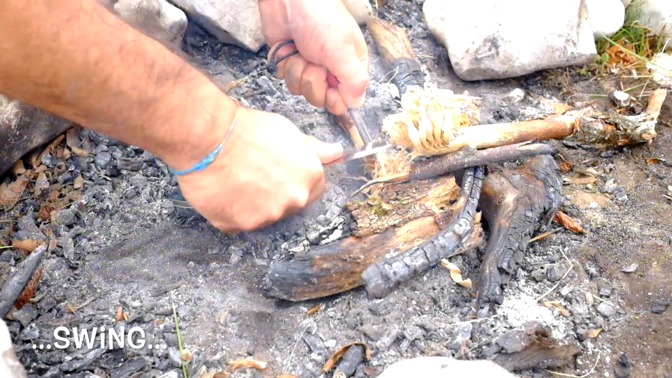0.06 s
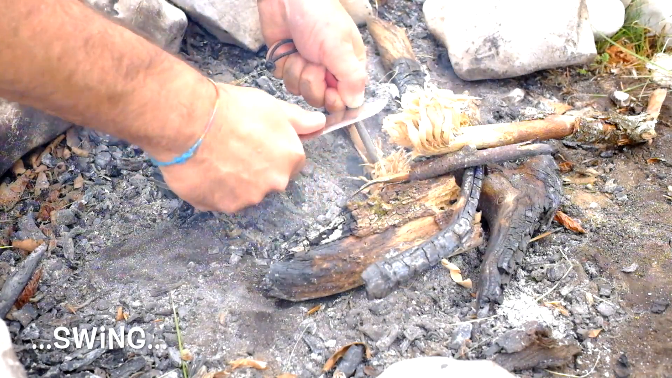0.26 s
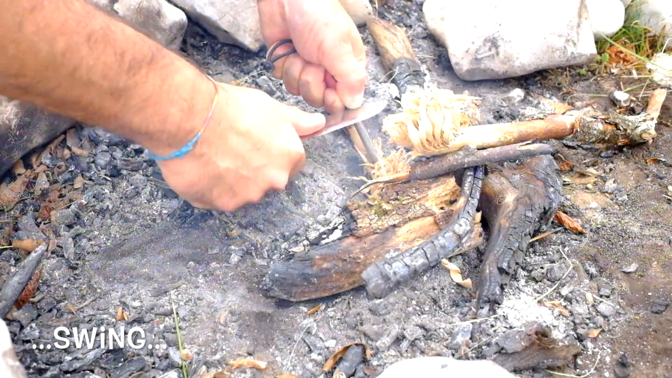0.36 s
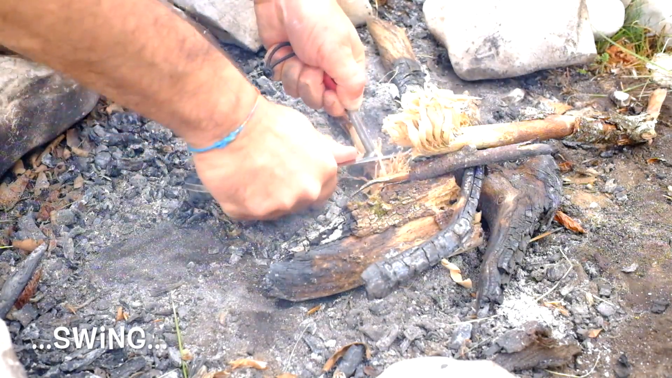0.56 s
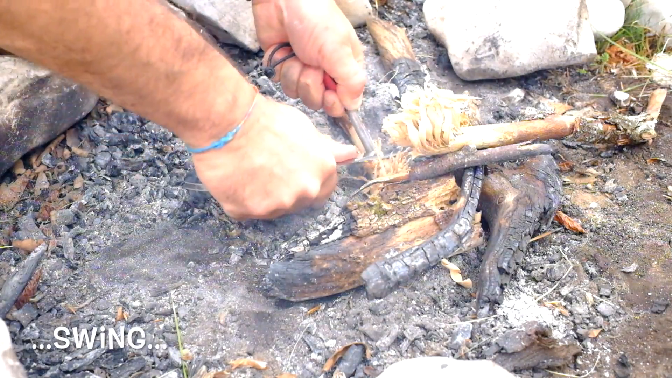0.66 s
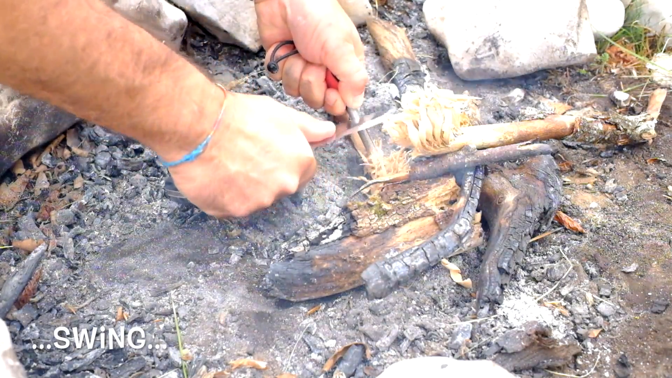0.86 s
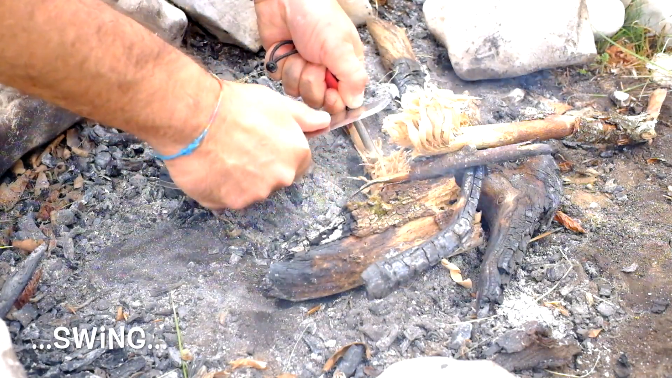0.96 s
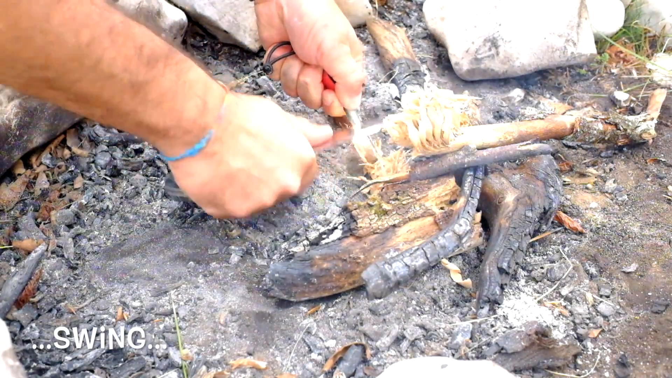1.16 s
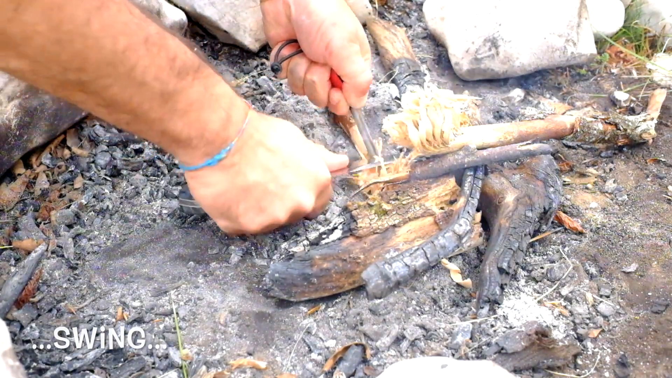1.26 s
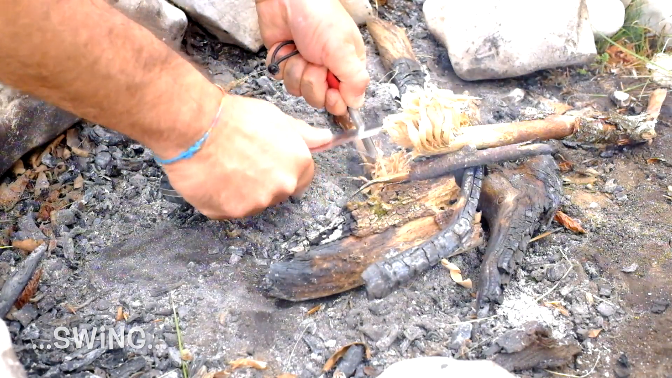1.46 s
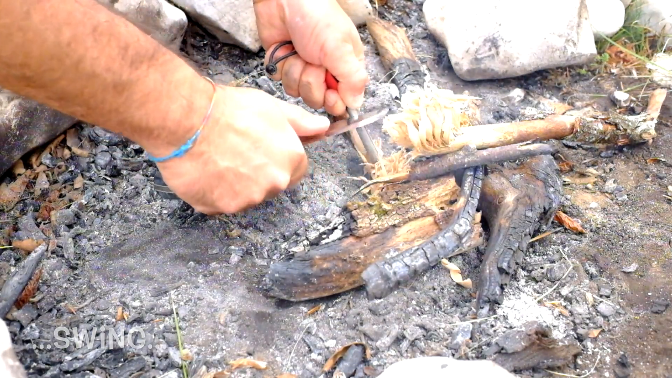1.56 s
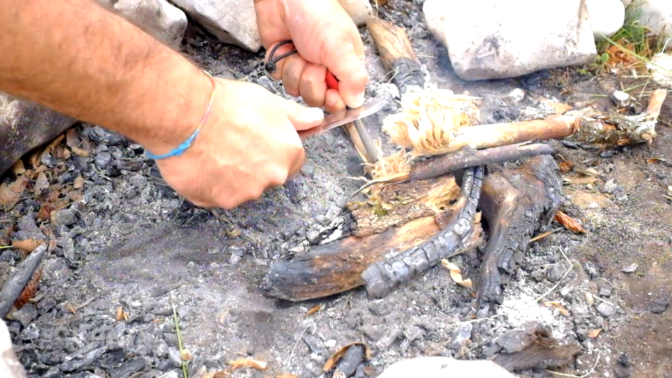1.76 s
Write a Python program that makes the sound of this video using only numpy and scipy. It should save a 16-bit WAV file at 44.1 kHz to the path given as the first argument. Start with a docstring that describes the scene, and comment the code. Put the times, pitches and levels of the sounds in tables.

```python
"""Outdoors, microphone close by: quiet air, a faint falling whistle (perhaps a bird), and a knife on a
ferro rod pressed on wood shavings. First the blade knocks on the rod and slides lightly along it, amid dry
ticks and crackles. Then comes a strike: a rasp of tiny slips over a low shudder, with a hiss of sparks and a
deep thud into the ground. A light slide back, a second strike and a last slide follow. The rod bobs when the
blade lets go. Friction is noisy slip trains through tool resonances; whistle and gliding resonances are
narrow noise bands; knock, bobs and thuds are short sines."""
import sys
import numpy as np
from scipy import signal
from scipy.fft import rfft, irfft, next_fast_len
from scipy.io import wavfile

SR = 44100
rng = np.random.default_rng(int(sys.argv[2]) if len(sys.argv) > 2 else 0)


def store_pcm(level_fs):
    """Save levels as 16-bit WAV."""
    pcm = np.round(np.clip(level_fs, -1, 1) * 32767).astype(np.int16)
    wavfile.write(sys.argv[1], SR, np.atleast_2d(pcm).T)


N = 81585  # length in samples

# Outdoor air spectrum: pitch_hz, relative_level_db
AIR_COLOUR = [(20, -8.5), (45, -3), (110, 0.5), (170, -5.5), (280, -12.5), (600, -15), (1150, -17),
              (1700, -23), (4000, -26), (15000, -28.5)]
# Stereo spread of the air: pitch_hz, side_against_middle_db
AIR_SIDE = [(30, -29), (150, -36), (1000, -20.5), (4000, -16.5), (12000, -7)]
AIR_DB = -59
# Brief narrow noise bands, most of them gliding: a faint falling whistle first (perhaps a bird),
# then resonances of the rubbing contact:
# start_s, end_s, from_hz, to_hz, width_hz, level_db (rms at the height of the swell)
GLIDES = [(0.014, 0.057, 5200, 3300, 700, -67.5), (.036, .05, 1700, 1750, 250, -57),
          (0.138, 0.202, 4700, 4090, 900, -56.5), (0.197, 0.244, 165, 120, 39.8, -47),
          (0.252, 0.323, 1950, 2540, 587, -57), (.305, 0.319, 3000, 3290, 597, -53.5),
          (0.463, 0.513, 283.3, 300, 59.5, -41), (0.512, .55, 370, 279, 79, -33),
          (0.554, 0.591, 190.2, 134, 30.3, -33), (.76, 0.846, 175.8, 145, 39.3, -46.5),
          (1.415, 1.511, 176, 142, 40, -45.5), (1.527, 1.596, 520, 474, 120, -47),
          (1.686, 1.717, 2176, 2980, 800, -65.5)]
# Dry ticks and crackles, levels before the layer trims:
# start_s, level_db, treble_against_body_db, chatter_decay_s, ring_hz
TICKS = [(.042, -53.5, -5, 0.0076, 1690), (.159, -34, -14, .004, 1200), (.185, -39, -18, 0.0056, 1210),
         (0.557, -28.5, -25, 0.0024, 755), (.567, -26.5, -16, 0.0027, 647),
         (0.6264, -37.5, -19, 0.0034, 1110), (0.629, -33.5, -15, 0.0088, 1100),
         (0.641, -49.5, 2, 0.0038, 1130), (.666, -52.5, -4, 0.0054, 1190), (0.7499, -37, -10, 0.01, 1100),
         (0.777, -39.5, -29, 0.0049, 1270), (.796, -34.5, -10, 0.0015, 1190), (.9285, -35, -3, 0.0029, 620),
         (0.941, -38, -10, 0.0016, 1130), (.970, -41, -2.5, 0.0055, 1140), (.986, -47.5, -4, 0.011, 1210),
         (1.007, -47, -1, 0.0035, 1150), (1.010, -34.5, -8, 0.0033, 1200), (1.0194, -42.5, -4, 0.0022, 720),
         (1.0505, -36.5, -6.5, 0.0048, 1100), (1.059, -39, -8, 0.0022, 590),
         (1.0639, -31.5, -2, 0.001, 1130), (1.066, -34, -5.5, .002, 1250),
         (1.1329, -38.5, -8.5, 0.0037, 1860), (1.137, -40, -5.5, 0.0064, 1810),
         (1.149, -37.5, -17, 0.0044, 1150), (1.156, -43.5, -11, 0.0075, 1100),
         (1.173, -46.5, -5, 0.013, 1210), (1.2747, -28, -11, 0.0046, 700),
         (1.2925, -25.5, -11, 0.0038, 1170), (1.3015, -22.5, -16, 0.0025, 1160),
         (1.323, -37, -12, 0.0039, 755), (1.3975, -43.5, -10.5, 0.0029, 1080),
         (1.7692, -46, -10, 0.002, 1130)]
TICK_RING_DB, TICK_RING_WIDTH_HZ, TICK_RISE_S = -5, 136, 0.0002
# Tick spectra, dull body and bright snap: pitch_hz, relative_level_db
TICK_BODY = [(80, -29), (200, -6.5), (600, 0.5), (1100, 1.5), (1550, -10), (2200, -14.5), (4000, -25),
             (15000, -63)]
TICK_SNAP = [(700, -18.5), (2000, 10.5), (4000, 3.5), (6000, -2.5), (9000, 0), (13000, -8), (16000, -9)]
# Light slides of the blade, one list of breakpoints each, levels before the layer trims:
# time_s, shudder_db, rasp_db, treble_db
SLIDES = [
    [(.07, -61, -61.5, -72), (.095, -40, -49.5, -58), (.135, -48.5, -44.5, -52.5), (.16, -54, -41, -49),
     (.2, -52, -49.5, -57), (.24, -52.5, -59.5, -56.5), (.262, -61, -57, -59), (.318, -47.5, -48, -52.5),
     (.326, -48.5, -66, -87)],
    [(.68, -77, -68, -65), (.71, -81, -50.5, -61), (.745, -73, -56.5, -72), (.78, -54, -45.5, -55),
     (.83, -45, -52, -62), (.87, -48, -44, -56.5), (.935, -42.5, -42.5, -53), (1.005, -45, -46, -61),
     (1.03, -64, -62, -81), (1.047, -67, -50, -60), (1.075, -58, -55, -59)],
    [(1.42, -48, -56, -83), (1.432, -43.5, -62, -68), (1.455, -47.5, -49, -59.5), (1.52, -48.5, -48, -54.5),
     (1.56, -46, -44.5, -52.5), (1.605, -48, -54, -64), (1.645, -62, -72, -85), (1.665, -51.5, -54, -66),
     (1.708, -53.5, -54, -56), (1.72, -65, -59, -85)],
]
# Friction spectra: low shudder, rasp, treble scuff of the slides: pitch_hz, relative_level_db
SHUDDER = [(30, -52.5), (80, -11.5), (125, -6), (180, 0), (300, -5), (450, -9), (900, -42.5), (3000, -100)]
RASP = [(120, -41), (300, -5), (500, 5.5), (800, 0), (1250, -1.5), (1550, -9), (2300, -21), (3500, -19),
        (5000, -52.5), (15000, -85)]
SCUFF = [(700, -47), (1600, -11), (2300, 7), (3200, -5), (4500, -5.5), (5300, -10), (7500, -10.5),
         (10000, -16.5), (16000, -24.5)]
# Resonances of blade, rod and wood: pitch_hz, width_hz, lift_db (negative is a dip)
RESONANCES = [(159.3, 84, 7), (296.4, 38, 6), (670, 37, 1.5), (770, 45, 1.5), (906, 62, -7), (1092, 125, 3),
              (1324, 71, 5.5), (1916, 154, 7.5), (3570, 140, 7.5), (3993, 200, 11.5), (4140, 41, 7),
              (5600, 270, 9), (6900, 240, 4), (8040, 770, 3), (11950, 840, 5.5)]
# Modes of the dull, short knock, before KNOCK_DB: pitch_hz, level_db, t60_s
KNOCK_MODES = [(223, -11, .014), (680, 8, 0.008), (1015, 2.5, 0.01), (1270, -31, 0.005)]
KNOCK_S, KNOCK_DB = .1038, -23.5
# The rod bobs as the blade lets go: start_s, level_db
BOBS = [(0.3223, -33), (0.558, -24), (1.068, -38.5), (1.717, -39.5)]
# The bob starts BOB_DROP_HZ above BOB_HZ and sinks towards it
BOB_HZ, BOB_DROP_HZ, BOB_SETTLE_S, BOB_RISE_S = 121.6, 106.7, 0.0078, .0042
# The two strikes, one list of breakpoints each, levels before the layer trims:
# time_s, shudder_db, rasp_db, spark_hiss_db, top_fizz_db
STRIKES = [
    [(0.452, -56, -73, -92, -86), (0.464, -40, -49.5, -59.5, -86), (0.48, -40, -44, -46.5, -71),
     (0.54, -32.5, -33.5, -43.5, -52.5), (0.57, -34.5, -33, -50, -64), (0.578, -42, -38.5, -62, -69),
     (0.596, -36.5, -40.5, -61, -71), (0.604, -44, -44, -61, -83), (0.614, -41, -53, -91, -86),
     (0.622, -45, -51, -79, -76)],
    [(1.208, -63, -57, -85, -86), (1.218, -50.5, -58, -70, -86), (1.24, -33, -43, -44, -70),
     (1.258, -35.5, -39.5, -45.5, -53), (1.276, -43, -30, -39, -55), (1.298, -34.5, -33, -43, -53),
     (1.314, -35, -35, -51, -60), (1.322, -33, -34.5, -47.5, -61), (1.36, -48, -45, -65, -75),
     (1.378, -64, -59, -81, -79)],
]
# Spectra of the spark hiss and the top fizz: pitch_hz, relative_level_db
SPARKS = [(800, -37), (2200, 1.5), (3000, 4), (4000, -1.5), (4800, -3), (6300, -0.5), (8500, -1.5),
          (10000, -8.5), (12000, -21), (16000, -34)]
FIZZ = [(4000, -27), (8000, -5), (10500, 6), (12500, -1.5), (16000, -5)]
# Deep thuds of the strikes into the ground: centre_s, level_db
THUDS = [(.566, -45.5), (1.295, -46)]
THUD_HZ, THUD_WIDTH_S = 38, 0.0098
TOP_HZ = 15850  # band limit of the recorder


def amp(db):
    """Decibels to gain."""
    return 10 ** (np.asarray(db) / 20)


def unit(x):
    """Scale to rms 1."""
    return x / np.sqrt(np.mean(x ** 2) + 1e-20)


def along(points, hz):
    """Interpolate (pitch_hz, value) points on a log frequency axis."""
    point_hz, value = np.transpose(points)
    return np.interp(np.log(hz + 1), np.log(point_hz + 1), value)


def coloured(x, gain_db):
    """Causal minimum-phase filter of unit energy, shaped by a dB response."""
    m = 2 * next_fast_len(N)
    log_gain = gain_db(np.fft.rfftfreq(m, 1 / SR)) * np.log(10) / 20
    # folding the cepstrum onto positive time makes the filter causal
    cepstrum = irfft(log_gain, m)
    cepstrum[1:m // 2] *= 2
    cepstrum[m // 2 + 1:] = 0
    response = np.exp(rfft(cepstrum))
    response /= np.sqrt(np.mean(abs(response) ** 2))
    return irfft(rfft(x, m) * response, m)[:N]


def ringing(force, colour):
    """Contact force heard through a colour and the resonances of the tools."""
    def gain_db(f):
        lift = sum(db * np.exp(-((f - hz) / width) ** 2) for hz, width, db in RESONANCES)
        return along(colour, f) + lift
    return coloured(force, gain_db)


def slips(rate, scatter_db, smooth):
    """An uneven train of tiny slips (median gap 1 / rate s) over smooth friction noise, rms 1."""
    count = int(N / SR * 16000)  # ample slips to fill the length
    draws = rng.standard_normal((count, 3))
    gaps = np.exp(.7 * draws[:, 0])
    at = (np.cumsum(gaps) * SR / rate).astype(int)
    size = amp(scatter_db * np.clip(draws[:, 1], -2, 2)) * np.sign(draws[:, 2])
    train = np.bincount(at[at < N], size[at < N], N)
    return unit(unit(train) + smooth * rng.standard_normal(N))


def levels(strokes):
    """One gain curve per level column, silent between strokes."""
    t = np.arange(N) / SR
    total = 0
    for rows in strokes:
        times, *columns = np.transpose(rows)
        touching = (t >= times[0]) & (t <= times[-1])
        total = total + np.array([amp(np.interp(t, times, column)) for column in columns]) * touching
    return total


def air():
    """Quiet outdoor background: coloured noise, wider in the treble."""
    mid = coloured(rng.standard_normal(N), lambda f: along(AIR_COLOUR, f))
    other = coloured(rng.standard_normal(N), lambda f: along(AIR_COLOUR, f))
    side_gain = amp(along(AIR_SIDE, np.fft.rfftfreq(N, 1 / SR)))
    side = irfft(rfft(other) * side_gain, N)
    return amp(AIR_DB) * np.array([mid + side, mid - side])


def glides():
    """The whistle, then the contact resonances: narrow noise bands that swell, mostly glide, and fade."""
    out = np.zeros(N)
    t = np.arange(N) / SR
    for start, end, from_hz, to_hz, width, db in GLIDES:
        progress = np.clip((t - start) / (end - start), 0, 1)
        lowpass = signal.butter(2, width / 2, fs=SR, output="sos")
        narrow = signal.sosfilt(lowpass, rng.standard_normal((2, N)))
        # carry the slow noise up to the moving pitch
        phase = 2 * np.pi * np.cumsum(from_hz + (to_hz - from_hz) * progress) / SR
        band = unit(narrow[0] * np.cos(phase) + narrow[1] * np.sin(phase))
        swell = np.sqrt(4 * progress * (1 - progress))
        out += amp(db) * swell * band
    return out


def ticks():
    """Each tick is one sharp catch followed by a dying chatter, with a brief woody ring."""
    body, snap, ring = np.zeros((3, N + SR))
    t = np.arange(SR // 20) / SR
    for start, db, treble_db, decay, hz in TICKS:
        crackle = rng.standard_normal(len(t)) * amp(4.9 * rng.standard_normal(len(t)))
        chatter = crackle * np.exp(-t / decay) * (1 - np.exp(-t / TICK_RISE_S))
        # a longer chatter carries more energy
        force = 0.85 * chatter / np.linalg.norm(chatter) * np.sqrt(decay / .004)
        force[0] -= .6  # the sharp catch
        b, a = signal.iirpeak(hz, hz / TICK_RING_WIDTH_HZ, SR)
        woody = signal.lfilter(b, a, force) * np.sqrt(SR / np.pi / TICK_RING_WIDTH_HZ)
        i = round(start * SR)
        body[i:][:len(t)] += amp(db) * force
        snap[i:][:len(t)] += amp(db + treble_db) * force
        ring[i:][:len(t)] += amp(db + TICK_RING_DB) * woody
    dull = ringing(body[:N], TICK_BODY) + ring[:N]
    bright = ringing(snap[:N], TICK_SNAP)
    return amp(18) * dull + amp(19.5) * bright


def slides():
    """The blade runs lightly back along the rough rod in three bands of slips."""
    low, mid, high = levels(SLIDES)
    shudder = ringing(low * slips(rate=650, scatter_db=-1, smooth=0.85), SHUDDER)
    rasp = ringing(mid * slips(rate=900, scatter_db=3, smooth=0.38), RASP)
    scuff = ringing(high * slips(rate=2500, scatter_db=5, smooth=.6), SCUFF)
    return amp(-2.05) * shudder + amp(-2.34) * rasp + amp(-1.13) * scuff


def knock():
    """The blade is set down on the rod: a few damped modes, thinned below 200 Hz."""
    t = np.maximum(np.arange(N) / SR - KNOCK_S, 0)
    modes = sum(amp(db - 60 * t / t60) * np.sin(2 * np.pi * hz * t) for hz, db, t60 in KNOCK_MODES)
    softened = modes * (1 - np.exp(-t / 0.0005))
    highpass = signal.butter(2, 200, "high", fs=SR, output="sos")
    return -amp(KNOCK_DB) * signal.sosfilt(highpass, softened)


def bobs():
    """A soft thump of the rod whose pitch sinks as the pressure comes off."""
    out = np.zeros(N + SR)
    t = np.arange(SR // 10) / SR
    pitch_hz = BOB_HZ + BOB_DROP_HZ * np.exp(-t / BOB_SETTLE_S)
    phase = 2 * np.pi * np.cumsum(pitch_hz) / SR
    u = t / BOB_RISE_S
    swell = (u / 2) ** 2 * np.exp(2 - u)  # reaches 1 at u = 2
    for start, db in BOBS:
        out[round(start * SR):][:len(t)] += amp(db) * swell * np.sin(phase)
    return out[:N]


def strikes():
    """The blade bites into the rod: it shudders, rasps and throws sparks, whose top fizz rises late."""
    low, mid, high, top = levels(STRIKES)
    shudder = ringing(low * slips(rate=700, scatter_db=1, smooth=0.47), SHUDDER)
    rasp = ringing(mid * slips(rate=1200, scatter_db=2.5, smooth=0.38), RASP)
    sparks = ringing(high * slips(rate=4600, scatter_db=4, smooth=0.93), SPARKS)
    fizz = ringing(top * slips(rate=2400, scatter_db=3.5, smooth=.8), FIZZ)
    return amp(-4.0) * shudder + amp(-0.75) * rasp + amp(2.0) * sparks + amp(2.3) * fizz


def thuds():
    """One slow push and rebound of the ground under each strike."""
    out = np.zeros(N)
    t = np.arange(N) / SR
    for centre, db in THUDS:
        swell = np.exp(-((t - centre) / THUD_WIDTH_S) ** 2)
        out += amp(db) * swell * np.sin(2 * np.pi * THUD_HZ * (t - centre))
    return out


def scene():
    """Whistle and handling are central and dry; only the background has width."""
    central = glides() + ticks() + slides() + knock() + bobs() + strikes() + thuds()
    return air() + central


def record(dry):
    """The recorder keeps nothing above its band limit."""
    m = 2 * next_fast_len(N)
    kept = np.fft.rfftfreq(m, 1 / SR) < TOP_HZ
    return irfft(rfft(dry, m) * kept, m)[:, :N]


dry = scene()
out = record(dry)
store_pcm(out)
```